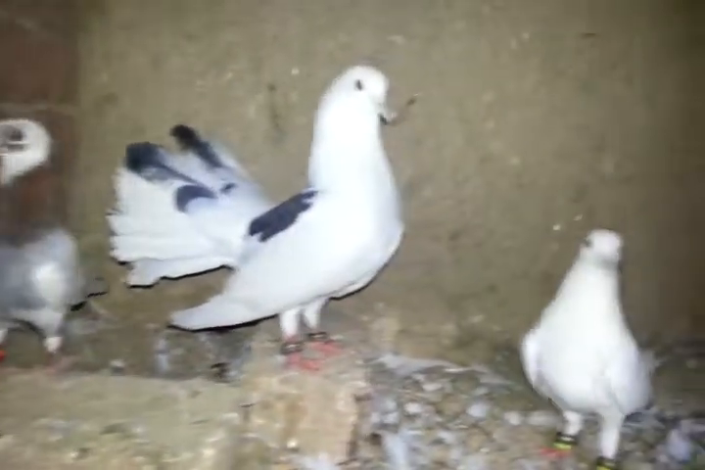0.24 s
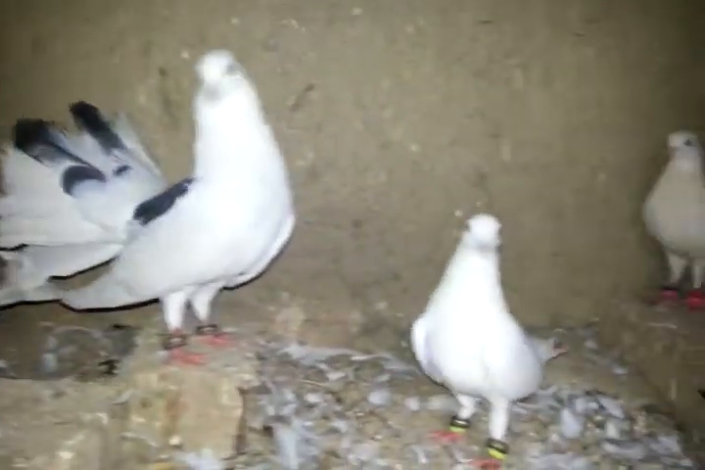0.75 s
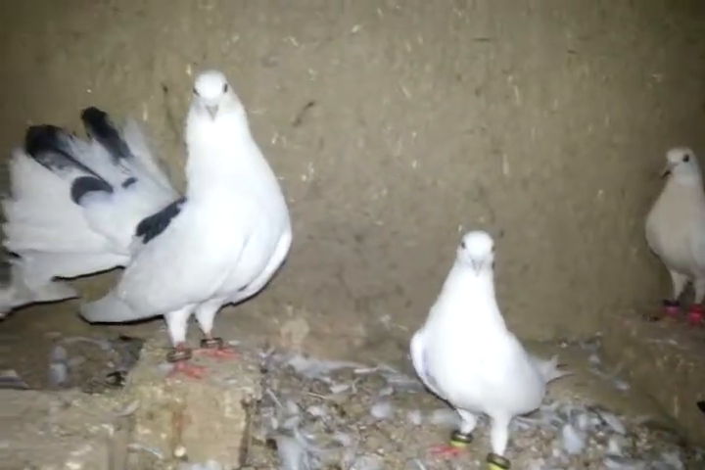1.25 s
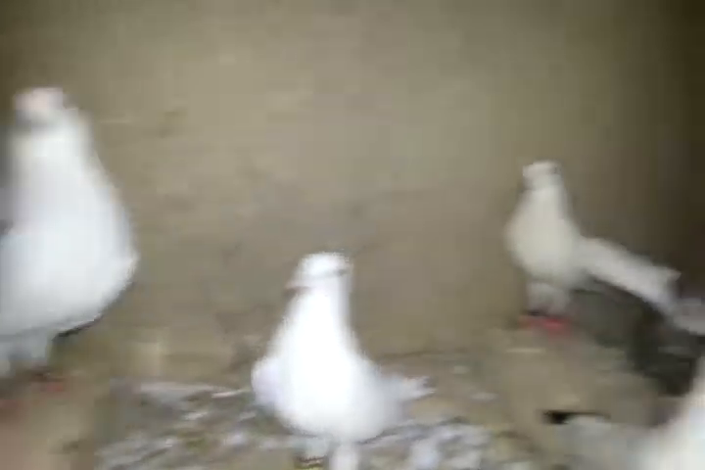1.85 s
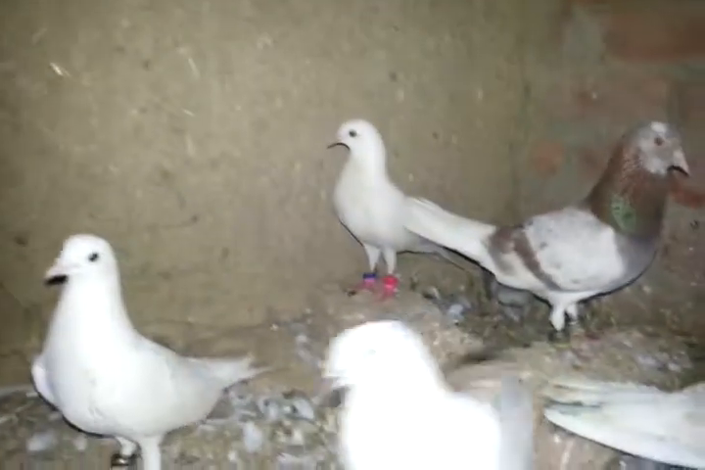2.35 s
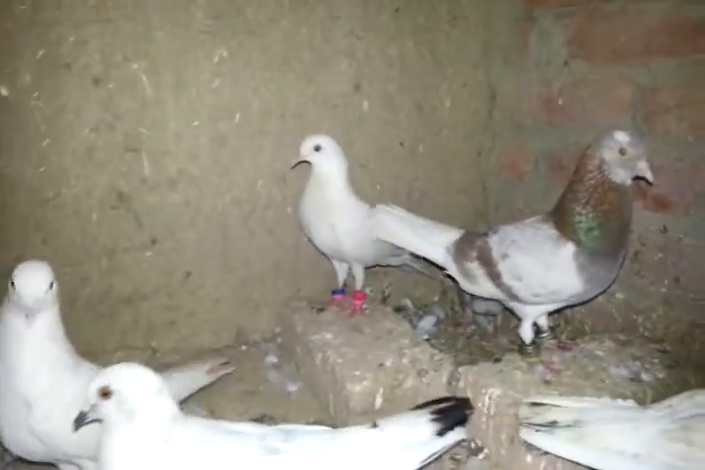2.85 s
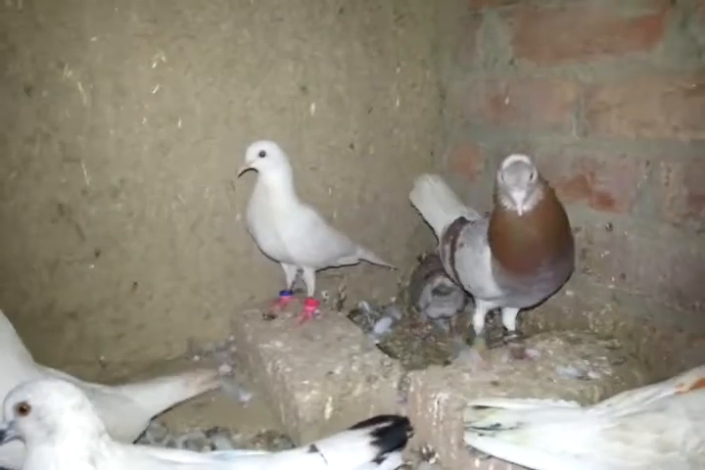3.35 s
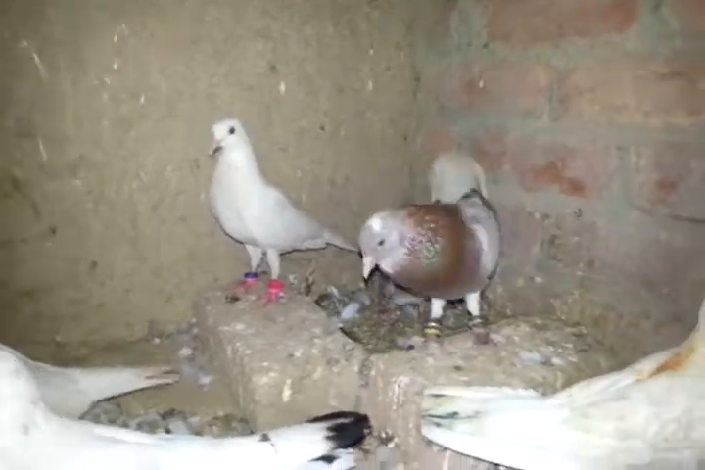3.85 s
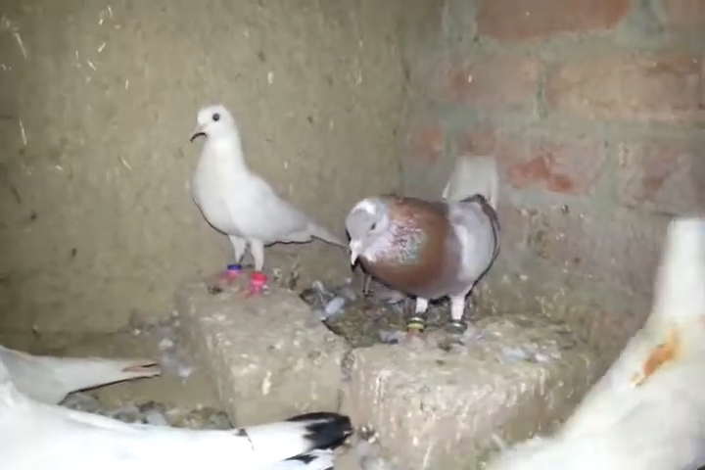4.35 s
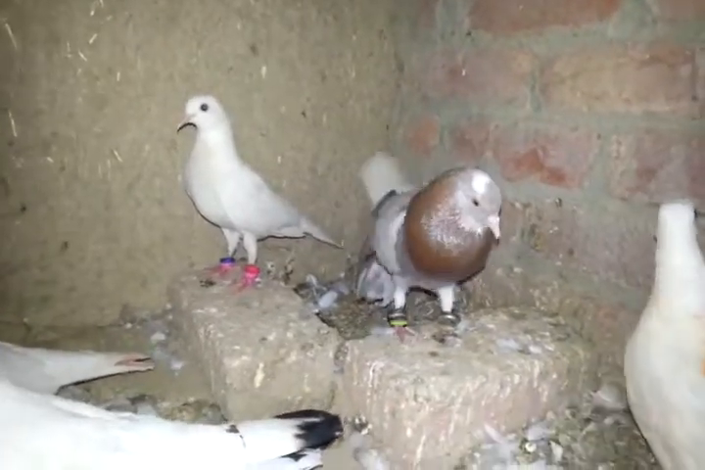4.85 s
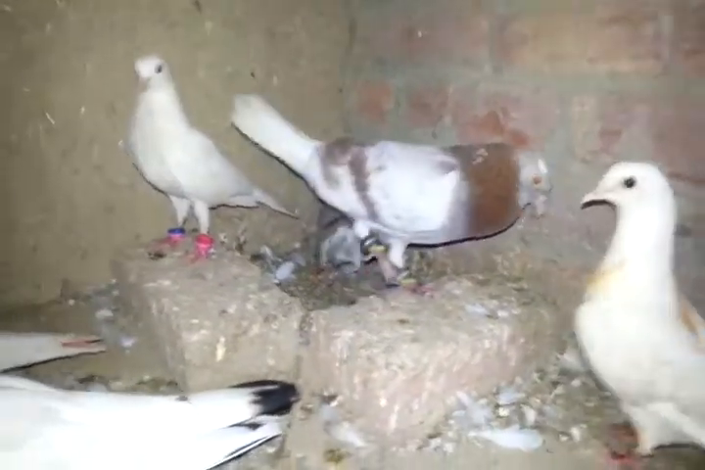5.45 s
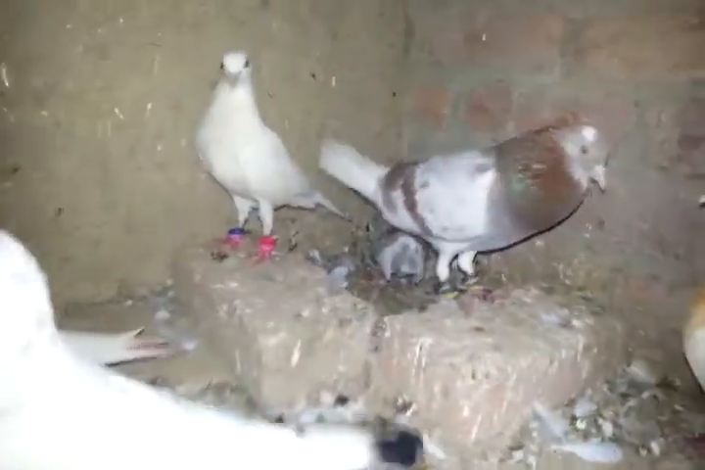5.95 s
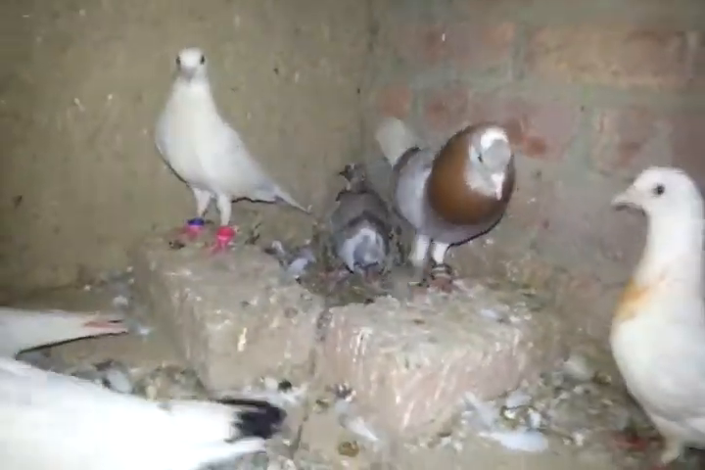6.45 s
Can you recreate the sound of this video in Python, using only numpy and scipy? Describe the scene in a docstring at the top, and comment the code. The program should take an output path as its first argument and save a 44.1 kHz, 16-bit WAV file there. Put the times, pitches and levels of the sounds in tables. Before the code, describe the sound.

A small brick pigeon loft, heard close in stereo, with faint hiss, low rumble and short wall reflections. Low growls open the scene with tiny bell ticks; at 0.3 s a strong rolling coo throbs rapidly, leaning left, then wavers into a moan until 0.9 s. Bright jingles touch 0.7 s, and thin squab whistles glide at 1.2 and 2.1 s among light claw scratches. From 2.4 to 3.6 s a rooster crows once in four syllables, hoarse at the edges, the third long and quavering; leg bells rattle over it from 3.1 s. Around 4 s come low growls, dry scrapes, overlapping peeps and a weaker coo with a moan to 4.8 s. Bells and rough growls cluster near 5 s with another peep. A strong coo rolls at 5.4 s and moans to 6 s, over a squeaky whistle. Jingles and growls fill 6.1 to 6.5 s, then a final throbbing roll and peep end it.

```python
"""Pigeons court in a small brick loft: four rolls of throbs, the first three ending in a moan, with low growls.
The coos are six partials through a crop resonance; the growls are noise chopped by slow, uneven flaps.
A squab peeps in gliding whistles and a rooster crows once in four syllables, hoarse at the edges.
Leg bells jingle as struck pairs of modes, feet scratch as noise bursts, and faint air hisses over a rumble.
The low voices ring the standing waves of the narrow room, and wall reflections trail most of the sounds."""
import sys
import numpy as np
from scipy import signal
from scipy.fft import rfft, irfft, next_fast_len
from scipy.io import wavfile
from scipy.ndimage import uniform_filter1d, map_coordinates

SR = 44100
rng = np.random.default_rng(int(sys.argv[2]) if len(sys.argv) > 2 else 0)


def master_out(mix):
    """Clip the mix to full scale and print it as 16-bit PCM to the path in sys.argv[1]."""
    frames = np.transpose(np.atleast_2d(mix))
    ceiling = np.clip(frames, -1, 1)
    pcm = np.round(ceiling * 32767).astype(np.int16)
    wavfile.write(sys.argv[1], SR, pcm)


N = 295911
TIME = np.arange(N) / SR

# throbs of the coo: (t/s, pitch f/Hz, width at half swell/s, chest level/dB, throat level/dB)
THROBS = [(0.325, 251.3, 0.0055, -23, -24.5), (0.37, 271.4, 0.0027, -13.5, -14),
          (0.437, 317, 0.011, -15.5, -7.5), (0.493, 272.6, 0.0034, -9, -5.5),
          (0.51, 276, 0.036, -29, -27.5), (0.89, 318.6, 0.01395, -45, -21.5),
          (4.225, 253.8, 0.0078, -26.5, -29), (4.285, 268.7, 0.011, -22.5, -19.5),
          (4.361, 277.4, 0.018, -29.5, -20), (4.795, 266.3, 0.012, -25, -26.5),
          (5.399, 270, 0.0092, -22.5, -15), (5.464, 290.8, 0.013, -15.5, -3.5),
          (5.531, 303.7, 0.01336, -39, -6.5), (5.568, 300.5, 0.012, -32.5, -15.5),
          (5.606, 276.2, 0.011, -17.5, -3.5), (5.996, 289.6, 0.0071, -22, -14.5),
          (6.56, 259.1, 0.013, -20.5, -20.5), (6.617, 285.5, 0.0085, -30, -8),
          (6.686, 301.8, 0.012, -18.5, -11)]


def from_db(db):
    """Decibels to gain."""
    return 10 ** (np.asarray(db) / 20)


def rms_one(x):
    """Scale to unit rms."""
    return x / np.sqrt(np.mean(x ** 2) + 1e-20)


def in_time(rows):
    """Each column of a breakpoint curve, read at every sample."""
    s, *columns = np.transpose(rows)
    return [np.interp(TIME, s, column) for column in columns]


def phrases(tables, fade=0.003):
    """A gate that is open during each table, then the joined columns."""
    gate = 0
    for table in tables:
        inside = np.minimum(TIME - table[0][0], table[-1][0] - TIME)
        gate = gate + np.clip(inside / fade + 1, 0, 1)
    joined = [row for table in tables for row in table]
    return [np.minimum(gate, 1)] + in_time(joined)


def at_hz(points, hz):
    """Read a spectrum on a log-frequency axis."""
    f, db = np.transpose(points)
    return np.interp(np.log(np.maximum(hz, 1)), np.log(f), db)


def noise(spectrum):
    """Noise of a given colour, rms 1."""
    size = next_fast_len(N)
    white = rfft(rng.standard_normal(size))
    colour = from_db(at_hz(spectrum, np.arange(len(white)) * SR / size))
    return rms_one(irfft(white * colour, size)[:N])


def drift(rate):
    """Smooth random wander with rms 1, drawn from two knots per cycle of the rate in Hz."""
    knots = rng.standard_normal(int(N / SR * rate * 2) + 4)
    return rms_one(map_coordinates(knots, [TIME * rate * 2], order=2, mode="nearest"))


def band(x, low_hz, high_hz, order=2):
    """Butterworth band-pass."""
    edges = [low_hz, min(high_hz, .45 * SR)]
    return signal.sosfilt(signal.butter(order, edges, "band", fs=SR, output="sos"), x + 1e-18)


def resonate(x, hz, width):
    """A two-pole resonance with gain 1 on top; its width in Hz sets how fast it dies away."""
    r = np.exp(-np.pi * width / SR)
    zeros = np.array([1, 0, -1]) * (1 - r * r) / 2
    return signal.lfilter(zeros, [1, -2 * r * np.cos(2 * np.pi * hz / SR), r * r], x + 1e-18)


def turn(hz):
    """Running phase of a pitch curve."""
    return 2 * np.pi * np.cumsum(hz) / SR


def envelope(start, end, attack, release):
    """Straight attack, hold, exponential release."""
    return np.clip((TIME - start) / attack, 0, 1) * np.exp(-np.clip((TIME - end) / release, 0, 20))


def place(x, pan_db, wet_db, t60):
    """Direct sound plus a dense wall tail, different at each ear; positive pan is louder on the left."""
    t = TIME[:int(.8 * SR)]
    tail = rng.standard_normal((2, len(t))) * from_db(-60 * t / t60) * (t > .003)
    tail *= from_db(wet_db) / np.sqrt(np.sum(tail ** 2, axis=1, keepdims=True))
    both = x + signal.fftconvolve(x[None], tail, axes=1)[:, :N]
    pan = from_db(np.array([[.5], [-.5]]) * pan_db)
    return both * pan / np.hypot(1, from_db(wet_db))   # the tail does not add to the total power


def ports(ears, lag=.00006):
    """The left channel trails the right by a small lag in seconds."""
    return np.array([np.interp(TIME - lag, TIME, ears[0]), ears[1]])


def corner(x, near_db=-10, far_db=-19):
    """Echoes from two walls beat against a gliding whistle and break it up."""
    # delays of the near and the far wall: (t/s)
    wall_echoes = (.0043, .015)
    return x + sum(from_db(db) * np.interp(TIME - s, TIME, x) for s, db in zip(wall_echoes, (near_db, far_db)))


def boom(x, coupling=1):
    """Low voices set the standing waves of the loft ringing."""
    # standing waves between the walls: (f/Hz, width/Hz, level/dB)
    loft_modes = [(167, 5.4, -23), (194, 13, 3), (251.5, 7.8, 2.5), (310.9, 7.5, 16.5), (394, 19, 4),
                  (534, 14, -11), (604, 2.3, 4)]
    return x + sum(from_db(db) * resonate(x * coupling, hz, width) for hz, width, db in loft_modes)


def background():
    """Faint air and rustling feathers over a steady rumble, part shared and part separate at each ear."""
    # colour of the still air: (f/Hz, relative level/dB)
    air_colour = [(15, -26), (25, -26), (131, -11), (172, -8), (264, -10.5), (293, -8), (373, -12.5),
                  (450, -10), (952, -19), (5280, -23.5), (6200, -32.5), (7890, -27.5), (12100, -28.5),
                  (15000, -27.5)]
    # swell of the hiss while the birds stir, above the still air: (t/s, level/dB)
    stir = [(0, 15.7), (.5, 22.8), (1.1, 16.7), (2.0, 14.1), (2.4, 19), (3.7, 17.2), (4.4, 18.6),
            (5.0, 17.6), (5.6, 18.5), (6.3, 19), (6.7, 22)]
    air_db, rumble_db, rumble_top_hz = -68, -68, 109
    stir_db, = in_time(stir)
    ears = noise(air_colour) + np.array([noise(air_colour), noise(air_colour)])
    rumble = rms_one(band(ears, 34, rumble_top_hz))
    hiss = rms_one(band(ears, rumble_top_hz, SR))
    return from_db(air_db + stir_db + .5 * drift(24)) * hiss + from_db(rumble_db) * rumble


def steps(decay_s=0.0065, level_db=-6):
    """Claws and beaks on grit: short decaying scrapes of coloured noise with a gritty flutter."""
    # touches: (t/s, relative level/dB)
    contacts = [(0.541, -33.5), (1.4812, -36), (1.5353, -32.5), (1.5783, -34), (1.6325, -37), (2.0865, -25),
                (2.1238, -35), (3.515, -21.5), (3.7541, -35.5), (4.0495, -23.5), (4.2214, -29.5),
                (4.2567, -25), (4.3259, -20), (4.4847, -27), (4.5304, -26), (4.8819, -25.5), (5.225, -24.5),
                (5.4196, -59)]
    # colour of the grit: (f/Hz, relative level/dB)
    grit = [(500, -3.5), (1300, -11), (3000, -7), (4300, -3), (6000, -17.5), (9000, -19), (14000, -34.5)]
    s, db = np.transpose(contacts)
    touches = np.zeros(N)
    touches[(s * SR).astype(int)] = from_db(db + level_db)
    decays = signal.lfilter([1], [1, -np.exp(-1 / (decay_s * SR))], touches + 1e-18)
    return decays * noise(grit) * from_db(1.7 * drift(250))


def bells(focus_db=24, scatter_db=3, split=0.016, count=6):
    """A pellet bounces round a slotted shell whose modes come in close pairs; the spot it hits favours some."""
    # shakes of the leg bells: (t/s, relative level/dB, brightest f/Hz)
    jingles = [(0.098, -28.5, 10700), (0.3244, -26, 10400), (0.3933, -23, 10900), (0.626, -32, 10900),
               (0.7068, -30, 10800), (0.7549, -16.5, 11500), (3.0563, -22, 7700), (3.0862, -18.5, 8200),
               (3.1066, -14.5, 7560), (3.257, -19.5, 10800), (3.1413, -28.5, 8385), (3.3655, -22, 8220),
               (3.382, -13.5, 7760), (3.4077, -10.5, 7680), (3.473, -23, 7770), (3.5553, -12, 11100),
               (3.614, -30, 9985), (4.81, -22.5, 10600), (4.8446, -11, 10870), (5.002, -29.5, 11040),
               (5.0607, -27.5, 10400), (5.1656, -15, 10300), (6.1417, -12, 8210), (6.1844, -4.5, 7960),
               (6.2086, -16, 9950), (6.4073, -22, 10500), (6.437, -16.5, 10800), (6.455, -14.5, 10850),
               (6.4993, -13, 10570)]
    # modes of the shell: (f/Hz, relative level/dB, t60/s)
    modes = [(4280, 10, 0.1856), (5750, -1, 0.092), (7300, -5.5, 0.19), (7780, 10.5, 0.051),
             (8200, -14, 0.066), (8340, 8, 0.049), (10100, -2.5, 0.18), (10450, 8, 0.079),
             (12300, -15, 0.049), (13840, -5, 0.073)]
    graze_db, rattle_db = -17, -5   # the touch before the hit; the loss at each bounce after it
    rattle_gap_s = 0.0065   # scaled at random for each bounce
    scrape_db, scrape_decay_s = -11, 0.003
    s, db, bright_hz = np.transpose(jingles)
    gaps = rattle_gap_s * rng.uniform(0.46, 2, (len(s), count))
    # the second contact is the hit and falls on the listed time
    contact_s = s[:, None] + np.cumsum(gaps, axis=1) - gaps[:, :2].sum(1, keepdims=True)
    at = np.minimum((contact_s * SR).astype(int), N - 1)
    hit_db = db[:, None] + np.r_[graze_db, rattle_db * np.arange(count - 1)]
    out = np.zeros((2, N))
    for hz, mode_db, t60 in modes:
        off_focus = np.minimum(abs(np.log2(hz / bright_hz)), .75)[:, None]   # octaves
        strength_db = hit_db + mode_db - 24.5 - focus_db * off_focus
        for twin_hz in (hz * (1 - split / 2), hz * (1 + split / 2)):
            clicks = np.zeros((2, N))
            strength = from_db(strength_db + scatter_db * rng.standard_normal(at.shape))
            clicks[:, at] = strength * rng.choice([-1, 1], (2,) + at.shape)
            r, w = from_db(-60 / (t60 * SR)), 2 * np.pi * twin_hz / SR
            out += signal.lfilter([0, np.sin(w)], [1, -2 * r * np.cos(w), r * r], clicks + 1e-18)
    # the pellet also scrapes along the shell
    for hz in (8200, 10500):
        contact = np.zeros(N)
        contact[at[:, 1]] = from_db(db + scrape_db - focus_db * abs(np.log2(hz / bright_hz)))
        scrape = rms_one(band(rng.standard_normal((2, N)), hz - 900, hz + 900, order=2))
        out += signal.lfilter([1], [1, -np.exp(-1 / (scrape_decay_s * SR))], contact + 1e-18) * scrape
    return band(out, 1870, 15000, order=4)


def crow_controls():
    """Pitch, fundamental and octave strength, roughness: each syllable swells, holds and fades."""
    # pitch of the crow: (t/s, f/Hz)
    crow_pitch = [(2.42, 846.5), (2.5, 726.5), (2.58, 796), (2.68, 763), (2.72, 823), (2.77, 876),
                  (2.83, 801.5), (2.92, 846), (2.95, 819), (3.0, 842), (3.1, 824.2), (3.26, 803),
                  (3.45, 763), (3.6, 689.3), (3.7, 628)]
    # syllables: (start t/s, end of hold t/s, swell time/s, fundamental level/dB, octave level/dB,
    # roughness at full voice/0-1)
    syllables = [(2.416, 2.538, 0.086, -22, -24, 0.54), (2.688, 2.757, 0.017, -12, -13.5, 0.08),
                 (2.91, 3.273, .075, -14, -13, 0.25), (3.436, 3.56, 0.052, -21.5, -29, 0.77)]
    onset_s, swell_db, fade_db_per_s = 0.0053, 22.5, 150
    tiring_db_per_s = 9.5   # a held syllable slowly weakens
    octave_lead = 0.57   # share of the swell that the octave skips: it speaks before the fundamental
    rough_per_db = 0.33   # the voice roughens as far as it is short of full effort
    pitch, = in_time(crow_pitch)
    first = octave = rough = 0
    for start, end, swell_s, first_db, octave_db, hoarse in syllables:
        faded_db = np.clip(fade_db_per_s * (TIME - end), 0, 80)
        short_db = swell_db * np.clip(1 - (TIME - start) / swell_s, 0, 1)
        tired_db = tiring_db_per_s * (np.clip(TIME, start, end) - (start + end) / 2)
        held = np.clip((TIME - start) / onset_s, 0, 1) * from_db(-short_db - faded_db - tired_db)
        first = first + held * from_db(first_db)
        octave = octave + held * from_db(octave_db + octave_lead * short_db)
        rough = np.where(TIME < start, rough, hoarse + rough_per_db * (short_db + faded_db))
    return pitch, first, octave, np.clip(rough, 0, 1)


def rooster(jitter=0.03463, hoarse_db=-8.0, uneven=0.11, stagger=0.18, quaver_hz=27.54):
    """Four syllables, clearer mid-syllable and hoarse at the edges; the first and last are two-voiced."""
    # quaver of the long third syllable: (t/s, depth/0-1)
    crow_quaver = [(3.0, .08), (3.1, .2), (3.15, .65), (3.28, .55), (3.4, .3)]
    # throat above the octave: (f/Hz, relative level/dB)
    crow_top = [(2300, -23), (2550, -13.5), (3300, -33), (4200, -40), (4950, -32.5), (5400, -50),
                (6600, -41), (9000, -37)]
    # colour of the hoarse noise: (f/Hz, relative level/dB)
    crow_hoarse = [(300, -25.5), (520, -17), (720, 4.5), (1000, -18.5), (1230, -3), (1400, -37), (1620, 0),
                   (1850, -18), (2050, -12), (2900, -22.5), (4900, -24.5), (5600, -50.5), (9000, -33)]
    # the other side of the syrinx sounds its own lower note: (t/s, f/Hz, relative level/dB)
    crow_second = [
        [(2.425, 599, -26), (2.48, 613.4, -14), (2.56, 627, -24.5), (2.6, 603, -56)],
        [(3.5, 652, -22.5), (3.56, 632, -17.5), (3.6, 558.4, -21.5), (3.65, 522, -33.5)],
    ]
    pitch, first, octave, rough = crow_controls()
    depth, = in_time(crow_quaver)
    effort = np.hypot(first, octave)
    quaver = depth * np.sin(turn(quaver_hz * (1 + 0.065 * drift(9.9))))
    phase = turn(pitch * (1 + jitter * rough * drift(110) + 0.039 * quaver))
    # in a rough voice the cycles come in uneven groups: lines appear between the harmonics
    groups = sum(drift(35) * np.sin(phase / count) for count in (2, 4, 7))
    phase = phase + stagger * rough * groups
    voice = first * np.sin(phase) * (1 + 0.71 * quaver) + octave * np.sin(2 * phase) * (1 + quaver)
    for k in range(3, 10):
        voice += effort * from_db(at_hz(crow_top, k * pitch) - 3.5) * np.sin(k * phase) * (1 + quaver)
    swing = np.clip(1 + uneven * rough * groups, 0, 3)
    voice = np.sqrt(2) * voice * swing * from_db(-4 * rough)
    voice += effort * rough * from_db(hoarse_db) * noise(crow_hoarse) * swing
    second_gate, second_hz, second_db = phrases(crow_second)
    phase = turn(second_hz * (1 + 0.011 * drift(90)))
    second = np.sin(phase) + from_db(-14) * np.sin(2 * phase)
    second += from_db(-30.5) * sum(np.sin(k * phase) for k in range(3, 7))
    return band(voice + second_gate * from_db(second_db - 2.5) * second, 474, 6000, order=3)


def squab(waver=0.00762, wander=.007, octave_db=-28, flutter_db=3.5):
    """Arched whistles, all but the fourth breaking out of a short hoarse buzz."""
    # peeps: (start t/s, end t/s, pitch aimed at f/Hz, then relative levels/dB of buzz, rise, crest, fall)
    peeps = [(1.23, 1.436, 5200, -48, -43.5, -55.5, -47), (2.074, 2.374, 5730, -53, -53, -47, -39.5),
             (4.123, 4.426, 5250, -46.5, -48, -41.5, -34.5), (4.317, 4.637, 5100, -72, -49, -34, -66),
             (5.064, 5.398, 5550, -41, -43.5, -45, -27.5), (5.624, 5.951, 4525, -36, -29.5, -35.5, -27),
             (6.601, 6.93, 4900, -35.5, -28.5, -95, -85)]
    # the throat favours the middle of each glide: (f/Hz, relative level/dB)
    peep_throat = [(2950, -31), (3300, -10), (3750, -1.5), (4300, -6.5), (4800, -6), (5600, -25.5)]
    low_hz, rise_hz_per_s, fall_hz_per_s = 2930, 23000, 40000
    rasp_s, edge_s = 0.03, 0.0043
    out = rasps = 0
    wobble = 1 + waver * drift(120) + wander * drift(16)
    flutter = from_db(flutter_db * drift(70))
    for start, end, top_hz, rasp_db, rise_db, crest_db, fall_db in peeps:
        t, span = np.clip(TIME, start, end), top_hz - low_hz
        rise = np.tanh(rise_hz_per_s * (t - start) / span)
        fall = np.tanh(fall_hz_per_s * (end - t) / span)
        hz = low_hz + span * rise * fall
        db = np.interp(t, [start + rasp_s, (start + end) / 2, end - rasp_s], [rise_db, crest_db, fall_db])
        level = flutter * from_db(db + at_hz(peep_throat, hz))
        phase = turn(hz * wobble)
        whistle = np.sqrt(2) * (np.sin(phase) + from_db(octave_db) * np.sin(2 * phase))
        out = out + envelope(start, end, rasp_s, edge_s) * level * whistle
        rasps = rasps + from_db(rasp_db) * envelope(start, start + rasp_s, edge_s, edge_s)
    buzz = noise([(1000, -13.5), (2300, -8), (3200, 9.0), (3900, 13.5), (4700, 7), (5600, -26), (9000, -28)])
    return out + buzz * (1 + 0.74 * np.sin(turn(190 * wobble))) * rasps


def growl_controls():
    """Chest, throat and rasp strength: a growl starts abruptly, sags and dies."""
    # growls of the pigeons: (start t/s, end t/s, relative chest level/dB, relative throat level/dB)
    growl_spans = [(0.0, 0.139, -53.5, -49.5), (0.186, 0.248, -42.5, -33), (0.722, 0.846, -46.5, -38.5),
                   (0.946, 1.013, -55, -46), (1.233, 1.272, -48, -42.5), (2.084, 2.108, -50, -41.5),
                   (3.824, 3.965, -50, -52), (3.995, 4.013, -53.5, -59), (4.066, 4.155, -44, -39),
                   (4.37, 4.52, -45.5, -47), (4.852, 4.905, -53, -40), (4.954, 4.982, -46, -34.5),
                   (5.015, 5.097, -40.5, -36), (5.107, 5.203, -50, -45.5), (5.227, 5.316, -40, -30),
                   (6.068, 6.166, -41, -29), (6.206, 6.3, -42.5, -39), (6.391, 6.432, -36.5, -32),
                   (6.448, 6.477, -42, -34.5), (6.52, 6.558, -45, -47)]
    # short rasps: (start t/s, end t/s, relative level/dB)
    rasp_spans = [(0.0, 0.01, -41), (0.244, 0.246, -39), (3.833, 3.872, -42), (4.118, 4.129, -34),
                  (4.534, 4.54, -35), (4.963, 4.975, -22.5), (5.006, 5.02, -32), (5.299, 5.304, -34),
                  (6.116, 6.166, -27), (6.441, 6.467, -32)]
    attack_s, release_s, sag_db_per_s = 0.0022, 0.0058, 22
    growl_rasp_db = -17.5   # rasp control in every growl, relative to its throat control
    chest = throat = 0
    for start, end, chest_db, throat_db in growl_spans:
        sag = from_db(-sag_db_per_s * np.maximum(TIME - start, 0))
        held = envelope(start, end, attack_s, release_s) * sag
        chest, throat = chest + held * from_db(chest_db), throat + held * from_db(throat_db)
    rasps = sum(from_db(db) * envelope(start, end, attack_s, release_s) for start, end, db in rasp_spans)
    return chest, throat, rasps + throat * from_db(growl_rasp_db)


def growls(pulse_hz=80, unevenness=0.1987, flap_depth=0.42, even_s=0.0151):
    """Air through a slack syrinx, chopped by slow uneven flaps, sounds the chest and throat resonances."""
    chest, throat, rasp = growl_controls()
    flaps = 1 + flap_depth * np.cos(turn(pulse_hz * (1 + unevenness * drift(40))))
    air = rng.standard_normal(N) * flaps
    layers = ((chest * from_db(8.5), boom(band(air, 162.0, 396, order=4))),
              (throat * from_db(0.5), boom(band(air, 446, 688, order=4))),
              (rasp * from_db(-8.5), band(air, 867, 1066, order=2)))
    out = 0
    for level, tone in layers:
        # steady pressure keeps the strength even from flap to flap
        strength = np.sqrt(np.abs(uniform_filter1d(tone ** 2, int(even_s * SR) + 1)) + 1e-12)
        out = out + level * rms_one(tone / strength * np.sqrt(flaps + .05))
    return out


def coo_controls():
    """Pitch, chest and throat strength of the rolls and moans that carry the throbs."""
    # rolls that open a coo: (start t/s, end t/s, chest level/dB, throat level/dB)
    rolls = [(0.319, 0.516, -39, -36), (4.296, 4.38, -37, -49), (5.432, 5.604, -22.5, -26.5),
             (6.588, 6.718, -19.5, -18.5)]
    # moans that follow: (start t/s, end t/s, chest level/dB, throat level/dB)
    moans = [(0.533, 0.917, -34.5, -38), (4.511, 4.809, -33, -31), (5.643, 6.026, -33, -28.5)]
    # wavering pitch of each moan: (t/s, f/Hz)
    moan_pitch = [
        [(0.55, 244.7), (0.632, 203.8), (0.65, 220.5), (0.718, 196.4), (0.738, 172.1), (0.782, 173.7),
         (0.892, 219.5), (0.91, 202.8)],
        [(4.52, 163.8), (4.534, 164.7), (4.588, 168.3), (4.648, 139), (4.708, 158), (4.73, 190.9),
         (4.802, 180.3), (4.82, 165.6)],
        [(5.65, 183.4), (5.688, 170), (5.742, 176.7), (5.752, 188.1), (5.832, 179.7), (5.848, 170.6),
         (5.946, 199.7), (6.0, 236)],
    ]
    # the voice climbs before a throb; the throat band stays strong in the first and is weaker in the others:
    # (t/s, pitch f/Hz, chest level/dB, throat level/dB)
    windups = [(0.403, 318.1, -23, -24), (4.331, 310.4, -28.5, -39), (5.508, 402.2, -16, -43),
               (6.665, 376, -27, -41)]
    attack_s, release_s = 0.0211, 0.0081
    swell_db_per_s, db_per_octave = 7, 12   # a moan grows as it goes on, and with its pitch
    throat_open_hz, throat_loss_db_per_hz = 172, 0.5   # a lower voice no longer reaches the throat resonance
    windup_s, windup_rise_hz_per_s = 0.01714, 1980
    pitch, = in_time([throb[:2] for throb in THROBS])
    chest = throat = 0
    for start, end, chest_db, throat_db in rolls:
        held = envelope(start, end, attack_s, release_s)
        chest, throat = chest + held * from_db(chest_db), throat + held * from_db(throat_db)
    for (start, end, chest_db, throat_db), curve in zip(moans, moan_pitch):
        hz, = in_time(curve)
        effort_db = swell_db_per_s * (np.clip(TIME, start, end) - (start + end) / 2)
        effort_db = effort_db + db_per_octave * np.log2(hz / np.mean(curve, axis=0)[1])
        held = envelope(start, end, attack_s, release_s) * from_db(effort_db)
        loss_db = throat_loss_db_per_hz * np.maximum(throat_open_hz - hz, 0)
        chest = chest + held * from_db(chest_db)
        throat = throat + held * from_db(throat_db - loss_db)
        pitch = pitch + (hz - pitch) * envelope(start, end + 2 * release_s, attack_s, release_s)
    for s, hz, chest_db, throat_db in windups:
        near = np.exp(-np.minimum(((TIME - s) / windup_s) ** 2, 10) ** 2)
        pitch = pitch + (hz + windup_rise_hz_per_s * (TIME - s) - pitch) * near
        chest = chest + (from_db(chest_db) - chest) * near
        throat = throat + (from_db(throat_db) - throat) * near
    return pitch, chest, throat


def coos(jitter=0.01087, shimmer_db=3.0, split_hz=460):
    """One closed-beak voice; every throb swells it for a moment while its pitch sags."""
    # resonance of the inflated crop: (f/Hz, relative level/dB)
    crop = [(130, -9), (200, -6), (310, 8), (420, -4.5), (560, 3.5), (660, -12.5), (740, -35.5),
            (1000, -42), (1500, -54.5)]
    chest_stretch, chest_lag_s, sag = 0.81, 0.0014, 0.072   # chest swell against the throat's; pitch sag
    dip, dip_after_s, dip_s = 0.84, 0.031, 0.0092
    pitch, chest, throat = coo_controls()
    chest = chest * from_db(shimmer_db * drift(50))
    throat = throat * from_db(shimmer_db * drift(50))
    # each throb spends the air, so the voice falters just after it
    for s, *_ in THROBS:
        left = 1 - dip / (1 + ((TIME - s - dip_after_s) / dip_s) ** 2) ** 2
        chest, throat = chest * left, throat * left
    for s, hz, length, chest_db, throat_db in THROBS:
        u = np.clip((TIME - s) / length, -10, 10)
        throat_swell = 2 ** (-(2 * u) ** 2)
        chest_swell = 2 ** (-(2 * (u - chest_lag_s / length) / chest_stretch) ** 2)
        pitch = pitch + (hz * (1 - sag * u) - pitch) * np.exp(-u ** 4)
        chest = chest + (from_db(chest_db) - chest) * chest_swell
        throat = throat + (from_db(throat_db) - throat) * throat_swell
    phase = turn(pitch * (1 + jitter * drift(60)))
    orders = np.arange(1, 7)[:, None]
    weight = from_db(at_hz(crop, orders * pitch))
    # partials below the split follow the chest, those above it the throat
    upper = np.clip((orders * pitch / split_hz - 1) * 6 + .5, 0, 1)
    partials = np.sin(orders * phase)
    voice = 0
    for level, share in ((chest, weight * (1 - upper)), (throat, weight * upper)):
        power = (share ** 2).sum(0) / 2
        voice = voice + level * (share * partials).sum(0) / np.sqrt(power + .002)
    return voice


def scene():
    """All the birds in the loft, each filtered, levelled and placed."""
    # the two cooing birds: (t/s, left over right level/dB, hoarseness/0-1, coupling to standing waves/0-1)
    coo_birds = [(1.0, 4, .22, .35), (3.8, 1, .17, 1)]
    side_db, hoarseness, coupling = in_time(coo_birds)
    grain = 1 + hoarseness * drift(85)
    cooing = from_db(-3.5) * band(boom(coos() * grain, coupling), 233, 4000, order=3)
    growling = from_db(-1) * band(growls(), 173, 4300, order=3)
    peeping = from_db(5.0) * corner(squab())
    crowing = from_db(-1.5) * rooster()
    scratching = band(steps(), 326, 14960)
    return (place(cooing, side_db, wet_db=-12, t60=.2)
            + place(growling, side_db, wet_db=-7, t60=.12)
            + ports(place(peeping, pan_db=6.5, wet_db=-10, t60=.12), lag=.00005)
            + place(crowing, pan_db=.8, wet_db=-3.5, t60=.35)
            + place(scratching, pan_db=5.5, wet_db=1, t60=0.2)
            + bells() + background())


def record(dry):
    """The top is cut steeply above 14.9 kHz."""
    return signal.sosfilt(signal.ellip(10, .1, 80, 14900, fs=SR, output="sos"), dry)


dry = scene()
out = record(dry)
master_out(out)
```